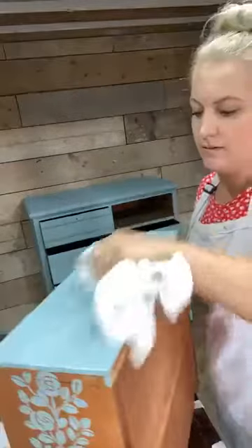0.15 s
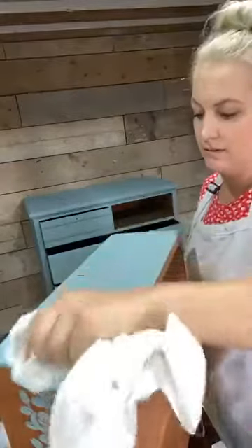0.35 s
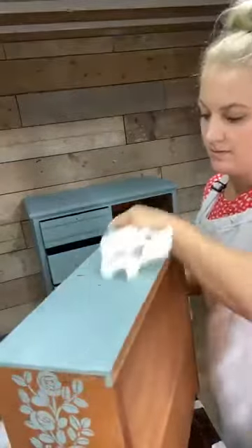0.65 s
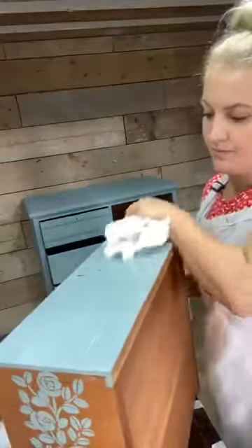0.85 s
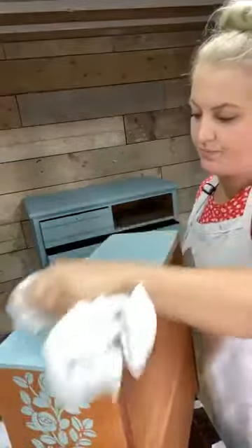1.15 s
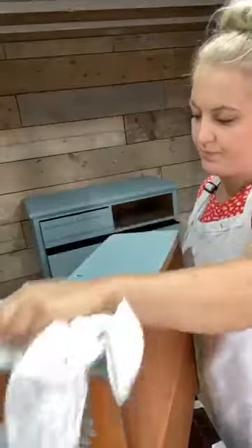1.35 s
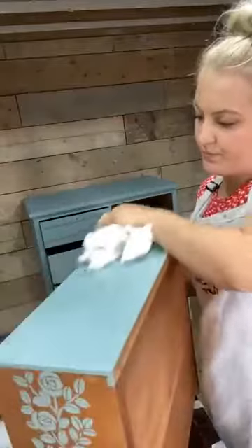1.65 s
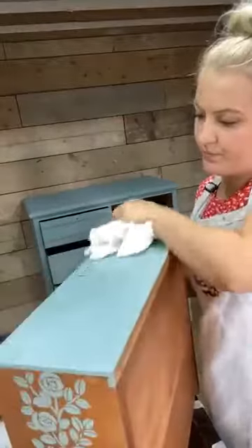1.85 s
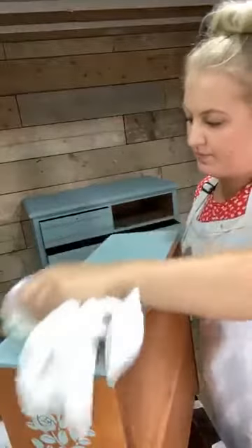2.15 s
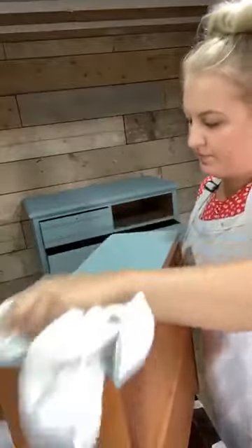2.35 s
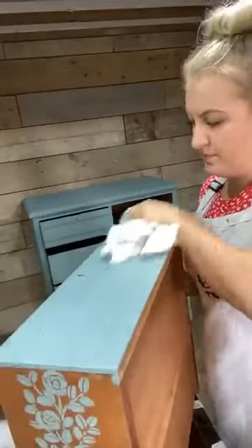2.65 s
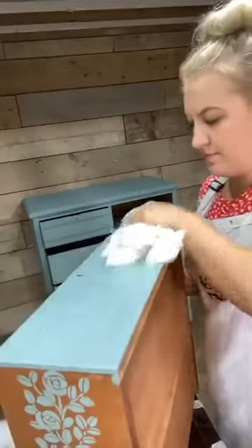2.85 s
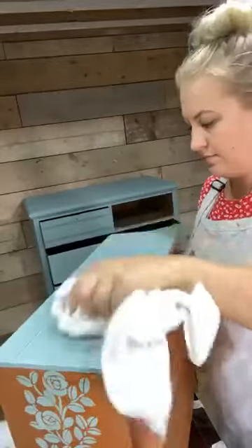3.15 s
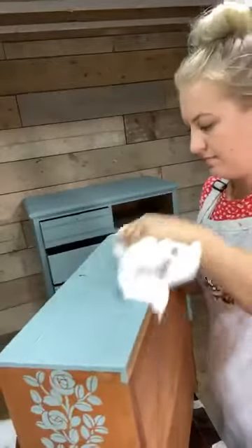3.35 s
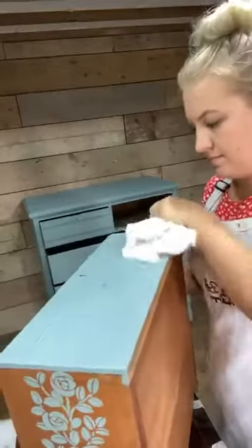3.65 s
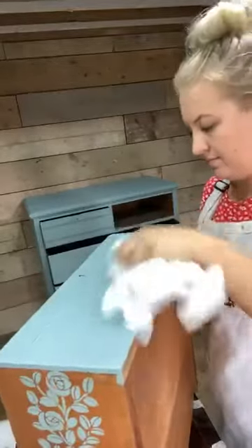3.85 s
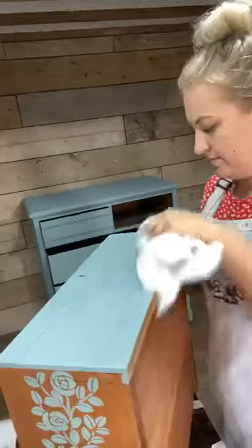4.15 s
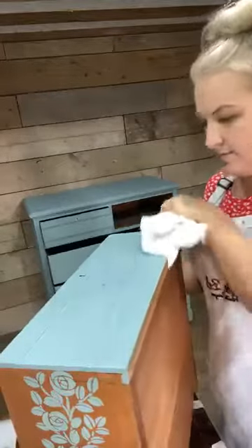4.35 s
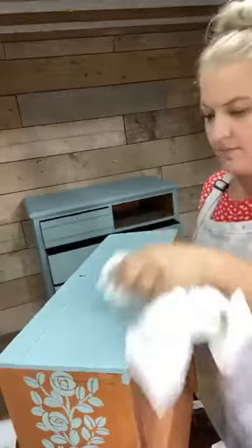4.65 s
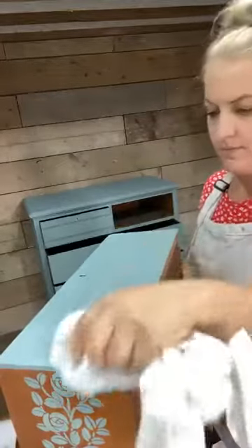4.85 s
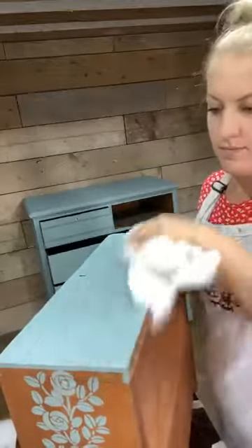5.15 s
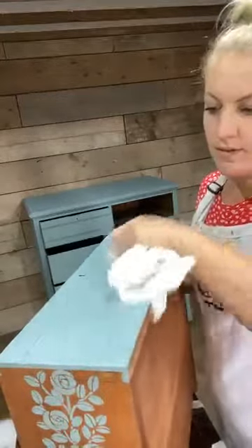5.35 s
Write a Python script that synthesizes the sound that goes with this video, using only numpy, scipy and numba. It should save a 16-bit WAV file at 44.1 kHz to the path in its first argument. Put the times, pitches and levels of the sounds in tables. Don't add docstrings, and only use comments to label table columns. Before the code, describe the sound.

A cloth rubs briskly back and forth over waxed wood, hissing with a rising and sinking rough note, while the hollow drawer knocks and thumps.

```python
import sys
import numpy as np
from scipy import signal
from scipy.fft import rfft, irfft, next_fast_len
from scipy.io import wavfile
from scipy.ndimage import uniform_filter1d
from numba import njit

SR = 44100
rng = np.random.default_rng(int(sys.argv[2]) if len(sys.argv) > 2 else 0)


def materialize(psi):
    bounded = np.clip(np.atleast_2d(psi).T, -1, 1)
    quanta = np.round(bounded * 32767).astype(np.int16)
    wavfile.write(sys.argv[1], SR, quanta)


def attenuation_scalar(level_db):
    decades = np.asarray(level_db, float) / 20
    return 10 ** decades


N = 242936

# (pitch [Hz], level [dB], time to fade 60 dB [s])
HOLLOW_TONES = [(81.1, -18, 0.157), (142.4, -19, 0.29), (188.97, -6.5, 0.199), (237, 0, 0.0944),
                (277.2, -1.5, 0.1028), (306.9, -8.5, 0.236)]
# (pitch [Hz], level [dB], time to fade 60 dB [s])
PANEL_TONES = [(461.2, -11, 0.395), (522.5, 5.5, 0.0846), (580, -5.5, 0.264), (571.4, 10.5, 0.0338),
               (686.3, 11.5, 0.0655), (695, 0.5, 0.111), (781.4, 5.5, 0.026), (909, -2.5, 0.084),
               (1000.3, 8, 0.111), (1019.9, 2.5, 0.174), (1086, -22.5, 0.143), (1193, 0.5, 0.097)]


def hand():
    # (under way [s], slows [s], hiss [dB], change over the stroke [dB])
    strokes = [(-.29, 0.148, -48, -6.5), (0.129, 0.469, -48, 1.5), (0.614, 0.947, -45.5, -6),
               (1.071, 1.4, -49, 3), (1.552, 1.926, -46.5, -6.5), (2.044, 2.376, -48, 1.6),
               (2.527, 2.855, -46.5, -3), (2.96, 3.262, -51, 2.5), (3.363, 3.676, -48.5, -0.23),
               (3.818, 4.093, -52, 4), (4.183, 4.5, -49.5, -4), (4.602, 4.967, -50, -0.33),
               (5.178, 5.373, -49, -0.72), (5.455, 5.819, -50.5, 3.5)]
    rests_s = [.07, .09, .072, .105, .062, .125, .075, .11, .096, .085, .071, .133, .075, .07]
    # (fastest moment [s], note [Hz], note sinks an octave in [s],
    # note level [dB], top end level [dB])
    speeds = [(-.1, 2990, 0.127, -1.8, -2.1), (.33, 3530, 0.169, -2.5, -0.6),
              (.7, 4360, 0.1265, 1.06, -1.47), (1.23, 3910, 0.1655, -1, 0.15), (1.7, 3907, .095, 2.5, -1),
              (2.19, 3600, 0.212, -2, -1.55), (2.62, 4163, 0.1794, -1.8, -0.72),
              (3.12, 3504, 0.194, -0.04, 0.77), (3.46, 3287, 0.215, -2.5, 1.94),
              (3.98, 3610, 0.168, -0.73, -0.5), (4.26, 3465, 0.197, -2, 3), (4.76, 4350, 0.175, 1.3, 2.32),
              (5.28, 4500, 0.1294, 0.33, 1.85), (5.6, 3500, .16, -0.5, 2)]
    # (share of the stroke [0-1], hiss [dB], top end over hiss [dB], note over hiss [dB])
    pull = [(-.1, -4.5, -15.5, -7), (.08, 1.78, -6, -4), (.3, 2.06, -8, 0.77), (.6, 0.37, -11.5, 1.43),
            (.9, 0.76, -10.5, -2.5), (1.15, -3, -13.5, -7)]
    # (share of the stroke [0-1], hiss [dB], top end over hiss [dB], note over hiss [dB])
    push = [(-.1, -15.5, -14.5, -0.5), (.12, 0.36, -13, -2.5), (.4, 1.5, -10, -0.64), (.7, 1.44, -8, -1),
            (.95, 1.65, -9.5, -4.5), (1.2, -4.5, -13, -9)]
    climb_s, climb_bend = 0.1103, 1.85
    sink_bend, stop_bend = 1.468, 2.18
    range_oct, climb_loss_db_per_oct = 2.2, 4
    set_off_db_per_s = 411

    t = np.arange(0, N + 64, 64) / SR
    courses = []
    for k, (stroke, rest_s, speed) in enumerate(zip(strokes, rests_s, speeds)):
        start_s, stop_s, level_db, change_db = stroke
        fastest_s, top_hz, sink_s, strength_db, bright_db = speed
        share, *shape = np.transpose(push if k % 2 else pull)
        progress = (t - start_s) / (stop_s - start_s)
        hiss_db, top_db, note_db = [np.interp(progress, share, c) for c in shape]

        early_s = np.maximum(start_s - t, 0)
        late_s = np.maximum(t - stop_s, 0)
        hiss_db += level_db + change_db * np.clip(progress, 0, 1)
        hiss_db -= set_off_db_per_s * early_s + 20 * (late_s / rest_s) ** stop_bend

        octaves = (np.maximum(fastest_s - t, 0) / climb_s) ** climb_bend
        note_db -= climb_loss_db_per_oct * np.minimum(octaves, range_oct)
        octaves += (np.maximum(t - fastest_s, 0) / sink_s) ** sink_bend
        note_hz = top_hz / 2 ** np.minimum(octaves, range_oct)
        courses.append([hiss_db, top_db + bright_db, note_hz, note_db + strength_db])

    courses = np.array(courses)
    loudest = courses[:, 0].argmax(axis=0)
    louder = np.take_along_axis(courses, loudest[None, None], axis=0)[0]
    return [np.interp(np.arange(N) / SR, t, c) for c in louder]


def cloth(hiss_db, top_db, note_hz, note_db):
    # (frequency [Hz], level per Hz [dB])
    hiss_colour = [(290, -55), (500, -22.5), (699, -5), (770, -6), (1030, -4.5), (1240, -3), (1500, -4.5),
                   (1730, -4), (2520, -4.5), (3720, -4), (5660, -6.5), (7790, -8), (12900, -19),
                   (14000, -19.5)]
    split_hz, patchy_db = 4390, 0.96
    hiss = rfft(coloured(rng.standard_normal(N), hiss_colour))
    octaves = np.log2(np.fft.rfftfreq(N, 1 / SR) + 1)
    patches = 0
    for centre in np.arange(8, 14.5, .5):
        share = np.cos(np.pi * np.clip(octaves - centre, -.5, .5)) ** 2
        lift_db = (top_db + 10) * np.clip(centre - np.log2(split_hz), 0, 1)
        patches = patches + irfft(hiss * share, N) * attenuation_scalar(lift_db + patchy_db * drift(33))

    note_hz = np.clip(note_hz * attenuation_scalar(.45 * drift(25)), 300, 7000)
    noise = rng.standard_normal((2, N))
    once = glide(noise[0], note_hz, 3., SR) * np.sqrt(note_hz)
    note = rms_one(glide(once, note_hz, 3., SR))
    note *= attenuation_scalar(-3.3 + 2.2 * drift(16))
    hump = rms_one(glide(noise[1], 1.142 * note_hz, 0.96, SR)) * attenuation_scalar(-0.5)
    return attenuation_scalar(hiss_db + 1.0 + 0.13 * drift(27)) * (rms_one(patches) + attenuation_scalar(note_db) * (note + hump))


def rumble(hiss_db, sway_db):
    # (time [s], level [dB])
    weight = [(0, -54), (.09, -45.5), (.2, -78), (.32, -57.5), (.42, -71), (.71, -57), (.95, -65.5),
              (1.26, -70), (1.4, -68), (2.12, -68), (2.25, -51.5), (2.4, -69.5), (2.67, -58), (2.96, -74.5),
              (3.36, -60), (3.7, -73.5), (5.1, -70.5), (5.3, -63.5)]
    hollow_db, = in_time(weight)
    panels_db = -56.5 + 0.3 * (hollow_db + 66.5)
    slack_db = .6 * np.minimum(hiss_db + 52, 0)

    drag = rng.standard_normal((2, N)) * attenuation_scalar(2.37 * drift(25))
    hollow = sum(attenuation_scalar(db) * ring(drag[0], hz, 1.1 * t60) for hz, db, t60 in HOLLOW_TONES[1:])
    panel = sum(attenuation_scalar(db - 1.6 * np.log2(hz / 700)) * ring(drag[1], hz, 0.92 * t60)
                for hz, db, t60 in PANEL_TONES)
    body = attenuation_scalar(hollow_db - 1.0) * rms_one(hollow)
    body += attenuation_scalar(panels_db - 5.5 + slack_db) * rms_one(panel)
    return body + attenuation_scalar(sway_db - 6.5) * rms_one(band(rng.standard_normal(N), 51.9, 90.9))


def knocks():
    # (time [s], peak [dB], hollow [dB], panel [dB], edge crack [dB])
    strikes = [
        (0.195, -26.5, -7, -4, 1),
        (1.137, -18, -11.5, -10, -3.5),
        (2.089, -25.5, -5, -7, -6.5),
        (3.02, -22, -10.5, -10, -9),
        (3.889, -27.5, -9, -8.5, -11),
        (4.667, -41.5, -20.5, -12, -3.5),
    ]
    # (pitch [Hz], level [dB], time to fade 60 dB [s])
    edge_tones = [(1450, 4, .04), (1850, 2, .035), (2230, 2, .03), (2630, 0, .025)]
    s, peak_db, hollow_db, panel_db, edge_db = np.transpose(strikes)
    dull = signal.lfilter(*signal.butter(2, 1050, fs=SR), clicks(s, peak_db + panel_db + 40.5))
    sharp = clicks(s, peak_db + edge_db + 24.5)
    wood = band(band(dull + sharp, 585, 2860), 203, 3450)
    wood += blows(s, peak_db + hollow_db - 4.0, HOLLOW_TONES, rattle_db=-4.0, rattle_s=0.0237)
    wood += blows(s, peak_db + panel_db - 13.5, PANEL_TONES, rattle_db=0.0, rattle_s=0.0168)
    wood += blows(s, peak_db + edge_db - 23.5, edge_tones, rattle_db=3.0, rattle_s=0.0056)
    return dispersed(wood, cycles=2.4, first_hz=2600)


def thumps():
    # (time [s], hollow [dB], panel [dB], boom [Hz], tap [Hz])
    landings = [(0.139, -28.5, -29.5, 247.7, 539.2), (0.159, -28.5, -61.5, 233.4, 533),
                (0.606, -44.5, -48, 222.2, 705), (1.072, -39, -42, 245.4, 518),
                (1.234, -36.5, -53.5, 304.9, 538), (1.535, -45.5, -41, 237, 685.6),
                (1.667, -46.5, -51.5, 303.6, 522.6), (2.498, -46, -53.5, 237, 526),
                (2.966, -26.5, -36.5, 229.4, 531.5), (3.343, -45.5, -41, 271.3, 566),
                (3.433, -41.5, -65.5, 236.9, 431), (3.827, -30, -41.5, 235.1, 441),
                (3.85, -23.5, -35, 237, 489), (3.934, -63, -41, 237, 668), (4.169, -37.5, -40.5, 237, 508),
                (4.621, -60, -45.5, 178, 701), (4.665, -49, -50, 234, 528), (5.139, -50, -53, 231, 695),
                (5.164, -51.5, -48, 248.4, 747), (5.208, -42.5, -46, 224.9, 758)]
    s, hollow_db, panel_db, boom_hz, tap_hz = np.transpose(landings)
    wood = band(clicks(s, panel_db + 35.0), 418, 419)
    wood += band(clicks(s, hollow_db + 25.5), 130.5, 337)
    wood += blows(s, hollow_db - 11.5, HOLLOW_TONES, rattle_db=4.5, rattle_s=0.053)
    wood += blows(s, panel_db - 23.5, PANEL_TONES[:6], rattle_db=8.5, rattle_s=0.0132)
    after_s = np.arange(SR // 5) / SR
    for k, start in enumerate((s * SR).astype(int)):
        boom = attenuation_scalar(hollow_db[k] - 1.0 - 60 * after_s / 0.1745) * np.sin(2 * np.pi * boom_hz[k] * after_s)
        tap = attenuation_scalar(panel_db[k] - 1.0 - 60 * after_s / 0.0713) * np.sin(2 * np.pi * tap_hz[k] * after_s)
        wood[start:start + len(boom)] += (boom + tap)[:N - start]
    return dispersed(wood, cycles=1.3495, first_hz=462.3)


def sway():
    # (time [s], level [dB])
    jolt_times = [(.14, -39), (.54, -51.5), (.9, -60.5), (1.08, -44.5), (1.56, -63.5), (1.9, -61),
                  (2.09, -51.5), (2.48, -63), (2.96, -46), (3.38, -59), (3.74, -53), (3.82, -46.5),
                  (4.92, -52.5), (5.2, -50.5), (5.4, -53)]
    rest_db, rise_s, t60_s = -70.5, 0.0162, 0.38
    fade = attenuation_scalar(-60 / (t60_s * SR))
    rise = np.exp(-1 / (rise_s * SR))
    force = clicks(*np.transpose(jolt_times))
    jolts = signal.lfilter([1 - rise], np.convolve([1, -fade], [1, -rise]), force)
    return 20 * np.log10(attenuation_scalar(rest_db + 1.22 * drift(5)) + 1.09 * jolts)


def room(x):
    t60_s, wall_cut_hz = 0.305, 2450
    size = next_fast_len(N + SR)
    w = 2 * np.pi * np.fft.rfftfreq(size)
    dull = 1 / (1 + 1j * w * SR / (2 * np.pi * wall_cut_hz))
    echo = 0
    for k, lag in enumerate(rng.uniform(.011, .037, 8) * SR):
        loop = attenuation_scalar(-60 * lag / SR / t60_s) * dull * np.exp(-1j * w * lag)
        echo = echo + (-1) ** k * loop / (1 - loop)
    return irfft(rfft(x, size) * echo, size)[:N]


def room_tone():
    # (frequency [Hz], level per Hz [dB])
    tone_colour = [(24, -37), (40, -3.5), (74, 3), (192, -19.5), (277, 2.5), (372, -12), (704, -2),
                   (878, -9), (2920, -13), (7770, -19), (14000, -29.5)]
    return attenuation_scalar(-63) * coloured(rng.standard_normal(N), tone_colour)


def rms_one(x):
    return x / np.sqrt(np.mean(x ** 2) + 1e-20)


def in_time(rows):
    s, *columns = np.transpose(rows)
    return [np.interp(np.arange(N) / SR, s, c) for c in columns]


def drift(rate):
    r = np.exp(-80 * np.pi * rate / SR)
    coarse = rng.standard_normal(N // 40 + 2002)
    slow = signal.lfilter([1], [1, -2 * r, r * r], coarse)[2000:]
    return np.interp(np.arange(N) / 40, np.arange(len(slow)), rms_one(slow))


def ring(force, hz, t60):
    r = attenuation_scalar(-60 / (t60 * SR))
    w = 2 * np.pi * hz / SR
    return signal.lfilter([0, np.sin(w)], [1, -2 * r * np.cos(w), r * r], force + 1e-18)


def coloured(x, spectrum):
    hz, level_db = np.transpose(spectrum)
    axis_hz = np.maximum(np.fft.rfftfreq(N, 1 / SR), 1)
    gain = attenuation_scalar(np.interp(np.log(axis_hz), np.log(hz), level_db))
    return rms_one(irfft(rfft(x) * gain, N))


@njit
def glide(x, hz, q, sr):
    out, band, low = np.zeros(len(x)), 0., 0.
    for i in range(len(x)):
        g = np.tan(np.pi * hz[i] / sr)
        high = (x[i] - (1 / q + g) * band - low) / (1 + g / q + g * g)
        out[i] = band + g * high
        band = out[i] + g * high
        low += 2 * g * out[i]
    return out / np.sqrt(hz)


def band(x, low_hz, high_hz):
    return signal.sosfilt(signal.butter(2, [low_hz, high_hz], "band", fs=SR, output="sos"), x)


def clicks(s, level_db):
    force = np.zeros(N)
    force[np.round(s * SR).astype(int)] = attenuation_scalar(level_db)
    return force


def blows(s, level_db, modes, rattle_db, rattle_s):
    force = clicks(s, level_db)
    fade = np.exp(-1 / (rattle_s * SR))
    rattle = attenuation_scalar(rattle_db) * signal.lfilter([1], [1, -fade], force)
    rattle = rattle * rng.standard_normal(N) / np.sqrt(rattle_s * SR)
    chance_db = 2.5 * rng.standard_normal((len(s), len(modes)))
    wood = 0
    for k, (hz, db, t60) in enumerate(modes):
        blow = (-1) ** k * clicks(s, level_db + chance_db[:, k])
        wood = wood + ring(blow + rattle, hz, t60) * attenuation_scalar(db)
    return wood


def dispersed(x, cycles, first_hz):
    hz = np.clip(np.fft.rfftfreq(N, 1 / SR), 120, 4000)
    late_s = cycles * (1 / hz - 1 / first_hz)
    return irfft(rfft(x) * np.exp(-2j * np.pi * np.cumsum(late_s) * SR / N), N)


def scene():
    hiss_db, top_db, note_hz, note_db = hand()
    near = cloth(hiss_db, top_db, note_hz, note_db)
    near += rumble(hiss_db, sway()) + knocks() + thumps()
    return np.tile(near + attenuation_scalar(-17.5) * room(near) + room_tone(), (2, 1))


def roll_off(x):
    return signal.sosfilt(signal.butter(12, 15620, fs=SR, output="sos"), x)


def record(dry):
    # (pitch [Hz], level under the sound [dB], rarity [spreads])
    whistles = [(14812, -43, -.3), (15563, -44, .9)]
    # (from [s], to [s])
    swaps = [
        (.2, .46),
        (1.21, 1.45),
        (2.1, 2.42),
        (4.66, 5.07),
    ]
    t = np.arange(N) / SR
    x = signal.sosfilt(signal.butter(3, 52, "high", fs=SR, output="sos"), dry)
    low = signal.sosfilt(signal.ellip(8, .5, 65, 14100, fs=SR, output="sos"), x)
    lower = signal.sosfilt(signal.ellip(8, .5, 65, 13400, fs=SR, output="sos"), x)
    top = signal.sosfilt(signal.ellip(6, .5, 50, 14300, "high", fs=SR, output="sos"), x)

    recent = signal.lfilter([.0003], [1, -.9997], np.abs(x[0]), zi=[.003])[0]
    spared = uniform_filter1d(1. * (recent < attenuation_scalar(-50.5 + 1.5 * drift(25))), size=600)

    level = np.sqrt(uniform_filter1d(band(x[0], 9000, 13000) ** 2, size=1500) + 1e-12)
    swapped = uniform_filter1d(sum(1. * (t > a) * (t < b) for a, b in swaps), size=400)
    low = low + swapped * (lower - low + attenuation_scalar(-16) * level * np.sin(2 * np.pi * 14062 * t))
    for hz, db, rarity in whistles:
        sounding = uniform_filter1d(1. * (drift(7) - swapped > rarity), size=400)
        low = low + attenuation_scalar(db + 20) * level * sounding * np.sin(2 * np.pi * hz * t)
    return roll_off(low + attenuation_scalar(-5.5) * spared * top)


dry = scene()
out = record(dry)
materialize(out)
```